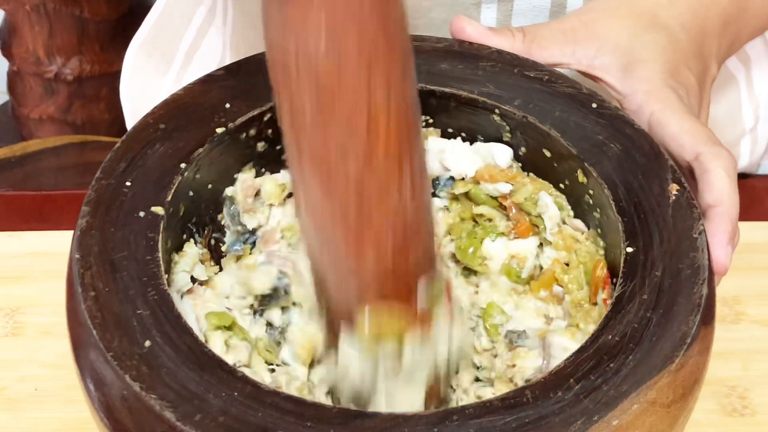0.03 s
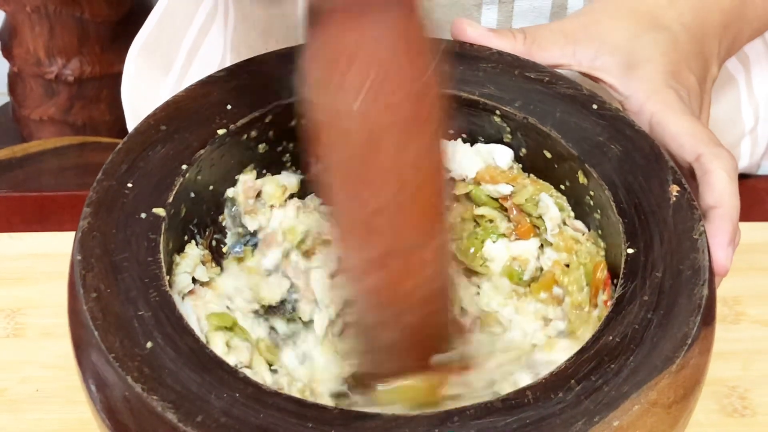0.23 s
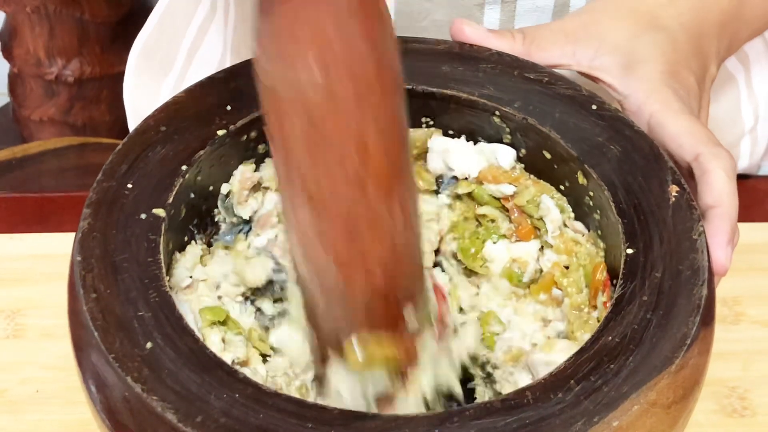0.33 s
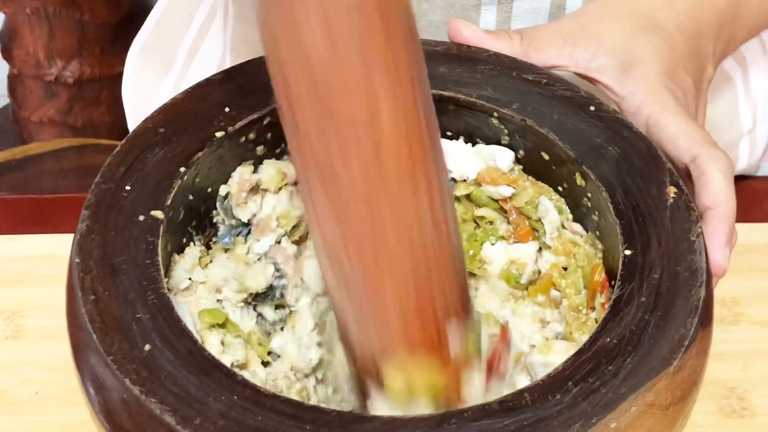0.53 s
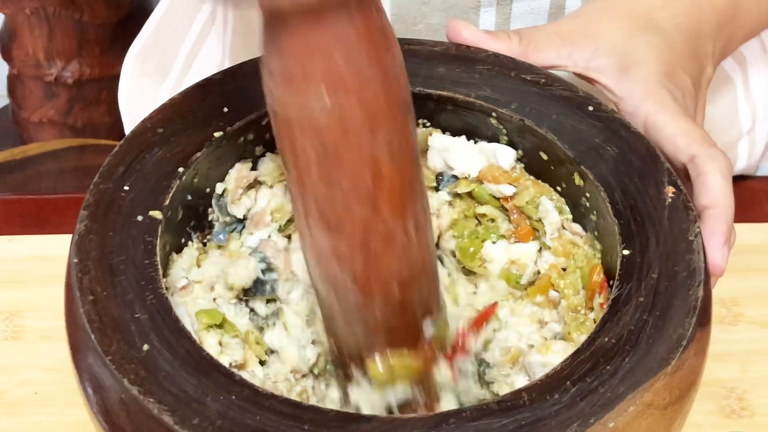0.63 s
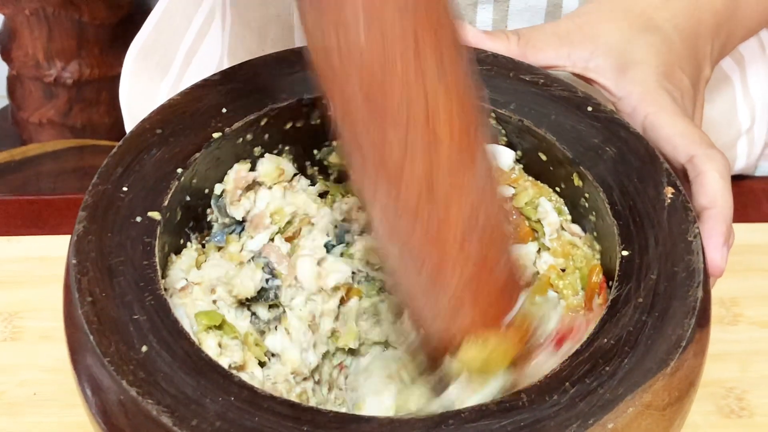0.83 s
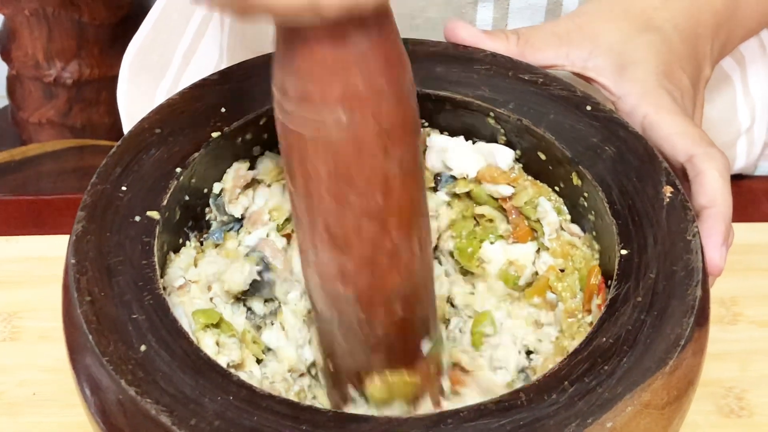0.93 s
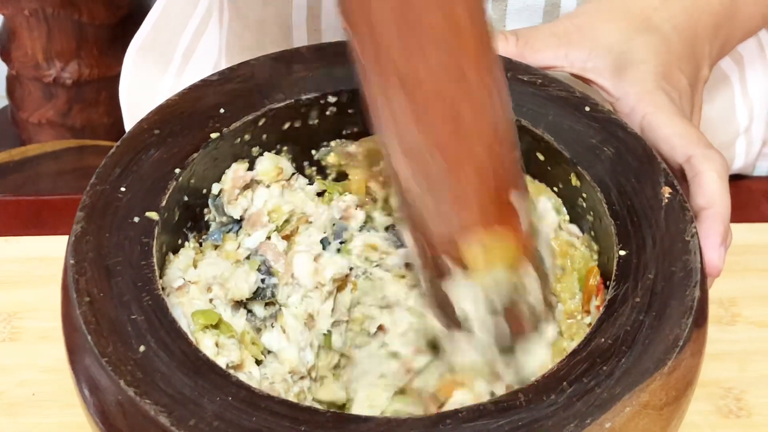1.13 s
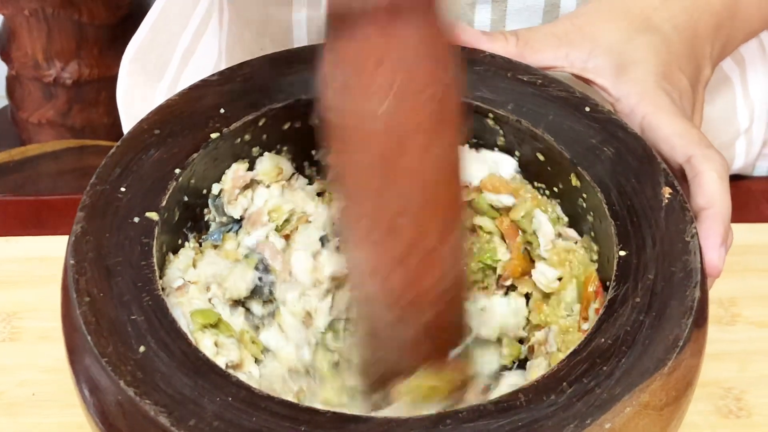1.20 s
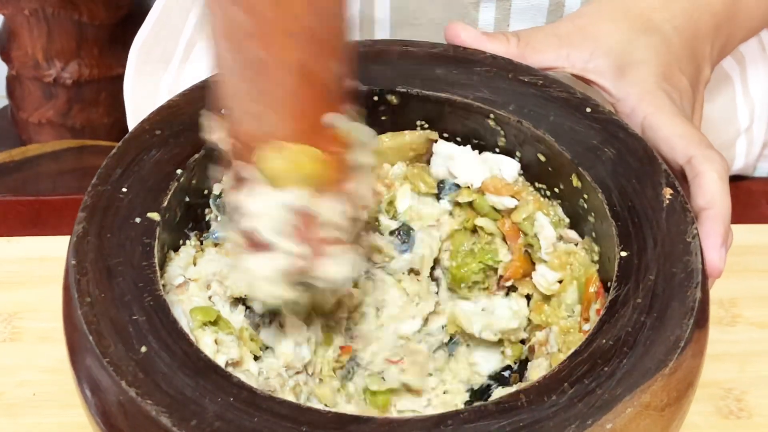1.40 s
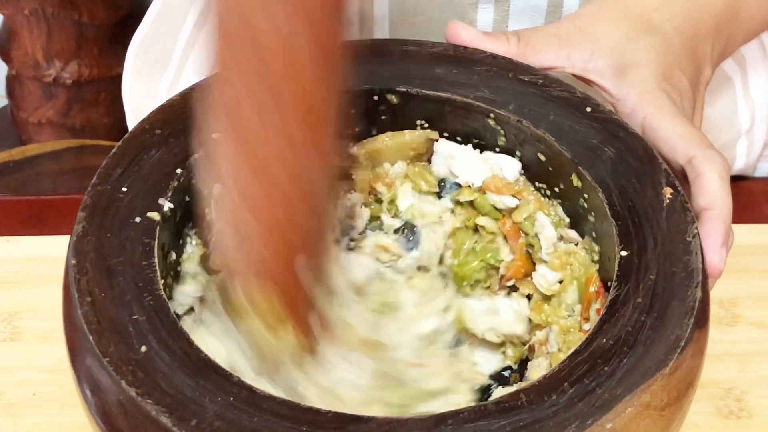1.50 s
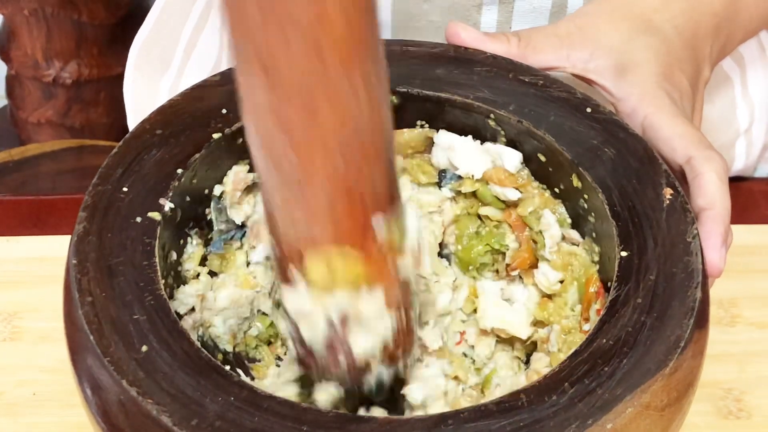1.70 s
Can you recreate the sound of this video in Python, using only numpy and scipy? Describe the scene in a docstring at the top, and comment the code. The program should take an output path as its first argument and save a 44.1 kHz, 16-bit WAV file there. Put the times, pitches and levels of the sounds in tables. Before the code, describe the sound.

A wooden pestle pounds wet mash in a wooden mortar, close by in a small quiet room. Firm hollow knocks with a low thud land at about 0.2 and 0.5 seconds, the second with the loudest squelch. A softer blow follows at 0.8, a faint wet press at 1.2, and another firm knock at 1.5. Short squelches and tiny wet pops trail each blow.

```python
"""Pounding wet mash in a wooden mortar

A wooden pestle pounds moist food, about three blows a second, close by in a small live room.
Each blow is a hollow knock that drops in pitch, a short ring of the wood and a thud of the table;
then the mash squelches and small wet pockets pop as the pestle grinds and lifts."""
import sys
import numpy as np
from scipy import signal
from scipy.fft import rfft, irfft, next_fast_len
from scipy.io import wavfile

SR = 44100
rng = np.random.default_rng(int(sys.argv[2]) if len(sys.argv) > 2 else 0)


def inscribe(sig):
    """Save sig as 16-bit PCM at rate SR to the path in sys.argv[1].

    A 1-D sig is mono; a 2-D sig holds one channel per row.
    Samples are clipped to [-1, 1] before scaling.
    """
    pcm = np.round(np.clip(np.atleast_2d(sig).T, -1, 1) * 32767)
    wavfile.write(sys.argv[1], SR, pcm.astype(np.int16))


N = 77175
LEAD = SR // 4  # samples of pre-roll, so a blow can ring in from before zero


def pestle():
    """Wood strikes wood: a hollow knock gliding down, a short ring, a blunt push and the table's thud."""
    # pestle blows: t/s, knock level/dB, hollow pitch/Hz, starts higher by/Hz, knock t60/s,
    # wood pitch/Hz, lower ring/dB, main ring/dB, upper ring/dB, push/dB, thud/dB
    blows = [(-.1, -5, 716, 308, 0.043, 1545, -34, -23.5, -44, -16, -32),
             (0.2083, -3, 715, 920, 0.026, 1626, -18, -14, -26, -21.5, -32.5),
             (0.5178, -4.5, 586, 654, 0.022, 1944, -25, -19, -34, -15, -32),
             (0.8232, -16, 765, 530, 0.037, 1954, -40, -38, -48, -31.5, -33.5),
             (1.162, -39, 655, 303, 0.025, 2130, -35, -40, -46, -40.5, -39),
             (1.4532, -3.5, 745, 186, 0.032, 1946, -31, -26, -72, -19, -38),
             (1.4765, -24.5, 794, 100, .022, 2010, -60, -49, -56, -50, -41)]
    # spectrum of the blunt contact: f/Hz, level/dB
    push_eq = [(30, -32), (100, -5.5), (180, -4), (300, -10.5), (520, 4), (900, -2.5), (1300, -11),
               (2200, -30), (2900, -18), (5000, -30), (16000, -38.5)]
    # the wood's three rings: ratio to the wood pitch, t60/s
    wood_modes = [(0.847, 0.027), (0.998, 0.031), (2.19, 0.021)]
    # low resonances of the table: f/Hz, level/dB, t60/s
    table_modes = [(69.7, -7.5, 0.15), (107.2, -4, 0.15), (151.2, 2, .18), (168.4, -1, 0.12),
                   (236.1, -6.5, 0.28), (337.5, -9.5, 0.22)]
    attack_s, glide_s = 0.0034, 0.0016
    out, t = np.zeros(LEAD + N), np.arange(SR // 2) / SR
    for s, db, hz, higher_hz, t60, wood_hz, *rings_db, push_db, thud_db in blows:
        pitch = hz + higher_hz * np.exp(-t / glide_s)
        knock = fade(t, attack_s, t60) * np.sin(2 * np.pi * np.cumsum(pitch) / SR)
        contact = rng.standard_normal(len(t)) * fade(t, attack_s, t60=0.011)
        push = coloured(contact, lambda f: along(push_eq, f))
        push /= np.abs(push).max()
        rings = [(wood_hz * ratio, level, life) for (ratio, life), level in zip(wood_modes, rings_db)]
        wood = ring(t, rings, attack_s=0.00033)
        thud = ring(t, table_modes, attack_s=0.015)
        add(out, s, in_room(amp(db) * knock + amp(push_db) * push + wood + amp(thud_db) * thud))
    return out


def squelches():
    """Squeezed mash: a swarm of tiny wet clicks over a fine fizz."""
    # squeezes of the mash: t/s, level/dB, rise/s, t60/s, treble tilt/(dB per octave)
    squeezes = [(.008, -47.5, 0.0027, 0.27, -1.5), (.191, -45.5, 0.0024, .06, -1.5),
                (.208, -37, 0.0086, 0.16, -3), (.27, -51, 0.006, 0.45, -2), (.328, -49.5, .024, 0.11, 0.5),
                (0.5156, -30, 0.0023, 0.017, 2.5), (.525, -47, 0.039, 0.15, -3),
                (.562, -23.5, 0.0052, 0.047, -0.5), (0.573, -40.5, 0.002, 0.33, -5),
                (.635, -51.5, 0.026, 0.23, 3.5), (.817, -38, 0.0071, 0.32, -5),
                (.882, -33.5, 0.0078, 0.031, -4), (.9, -49.5, 0.058, 0.19, -2.5),
                (1.122, -50.5, 0.019, 0.21, -1), (1.159, -42.5, .005, 0.29, -1),
                (1.228, -45, 0.015, 0.23, 2), (1.453, -44.5, 0.015, 0.42, 1.5),
                (1.508, -44.5, 0.0087, 0.19, -2), (1.575, -47.5, 0.025, 0.23, -5.5)]
    # spectrum of the wet mash: f/Hz, level/dB
    mash_eq = [(40, -43), (200, -14), (400, -7), (700, 7.5), (1300, 0), (2000, 3.5), (2800, -0.5),
               (4200, -2), (5500, -3.5), (7200, -5), (10000, -5.5), (15500, -10.5)]
    fizz_db, tilt_corner_hz = -2, 2000
    out, t = np.zeros(LEAD + N), np.arange(SR // 2) / SR
    for s, db, rise, t60, tilt_db in squeezes:
        swarm = unit(crackle(len(t)) + amp(fizz_db) * rng.standard_normal(len(t)))
        press = np.minimum(t / rise, 1) * amp(-60 * np.maximum(t - rise, 0) / t60)
        squelch = coloured(swarm * press,
                           lambda f: along(mash_eq, f) + tilt_db * np.log2(1 + f / tilt_corner_hz))
        add(out, s, amp(db) * in_room(squelch))
    return out


def crackle(size):
    """Tiny bursting films of liquid, each with its own pitch and strength; rms 1."""
    grains_per_s, spread_db, t60 = 2200, 4, 0.0034
    low_hz, high_hz = 640, 15330
    t = np.arange(SR // 150) / SR
    when, pitch, strength, phase = rng.random((int(grains_per_s * size / SR), 4)).T
    hz = low_hz + (high_hz - low_hz) * pitch
    gain = amp(spread_db * np.minimum(-np.log(1 - strength), 3))  # many soft, a few loud
    tones = np.sin(2 * np.pi * (hz[:, None] * t + phase[:, None]))
    grains = gain[:, None] * tones * amp(-60 * t / t60)
    where = (when * size).astype(int)[:, None] + np.arange(len(t))
    return unit(np.bincount(where.ravel(), grains.ravel(), size)[:size])


def pops():
    """Larger wet pockets burst, each a brief snap around its own pitch."""
    # bursting pockets: t/s, level/dB, f/Hz
    pockets = [(.2798, -28.5, 4260), (0.2878, -32, 4160), (.352, -44, 11500), (.356, -40.5, 2630),
               (0.5681, -16, 5430), (0.5204, -23, 13300), (.578, -32, 4930), (0.598, -23.5, 4820),
               (.598, -24.5, 9100), (.6587, -34, 3520), (0.8868, -27, 5300), (1.0205, -37, 9400),
               (1.1385, -36, 3130), (0.1927, -44, 7300), (1.1629, -28.5, 6160), (1.1813, -38, 1870),
               (1.2335, -41, 11000), (1.2464, -33, 5300), (1.25, -34.5, 4500), (1.618, -36.5, 8900)]
    t60, width_oct, click_db = 0.0074, 0.18, 14.5
    out, t = np.zeros(LEAD + N), np.arange(SR // 20) / SR
    for s, db, hz in pockets:
        burst = rng.standard_normal(len(t)) * amp(-60 * t / t60) + amp(click_db) * (t == 0)
        snap = coloured(burst, lambda f: -10 * np.log10(1 + (np.log2((f + 1) / hz) / width_oct) ** 4))
        add(out, s, amp(db) * in_room(snap / np.abs(snap).max()))
    return out


def grinding():
    """The dragged pestle rubs the bowl: a dull murmur through the resonances of mortar and table."""
    # drags through the mash after landing: t/s, level/dB, swell/s
    drags = [(0.216, -46, 0.012), (.535, -39.5, 0.033), (.835, -40.5, 0.03), (1.163, -48, 0.019),
             (1.485, -43.5, 0.03)]
    # body of mortar and table: f/Hz, level/dB
    body_eq = [(40, -14.5), (75, -5.5), (110, -4.5), (152, 5), (200, -5.5), (236, -1), (285, -12.5),
               (340, 0.5), (430, -10), (580, -3.5), (770, -0.5), (1100, -24), (2200, -19), (6000, -51)]
    out, t = np.zeros(LEAD + N), np.arange(SR // 3) / SR
    for s, db, swell_s in drags:
        rub = unit(coloured(rng.standard_normal(len(t)), lambda f: along(body_eq, f)))
        add(out, s, amp(db) * in_room(rub * swell(t, swell_s)))
    return out


def booms(hz=71):
    """A deep note, likely of the table, swells and dies after the blows."""
    # deep notes: t/s, level/dB
    notes = [(0.234, -44), (.565, -33), (0.877, -43), (1.179, -53), (1.473, -62)]
    out, t = np.zeros(LEAD + N), np.arange(SR // 2) / SR
    boom = swell(t, peak_s=0.034) * np.sin(2 * np.pi * hz * t)
    for s, db in notes:
        add(out, s, amp(db) * boom)
    return out


def in_room(x):
    """The direct sound, then a quick slap off the near walls and a diffuse tail, longest in the bass."""
    # decay of the room: f/Hz, t60/s
    decay = [(60, 0.95), (150, 0.95), (760, 0.64), (2000, 0.78), (4000, 0.59), (5600, 0.54), (7500, 0.41),
             (10000, 0.21), (16000, 0.54)]
    # colour of the tail: f/Hz, level/dB
    tail_eq = [(60, 8.5), (200, 6), (760, 0.5), (2000, -3), (5500, -1), (15000, 0)]
    predelay_s, tail_db, walls_db, walls_t60 = 0.012, -12, -11.5, 0.06
    hz, t, noise = signal.stft(rng.standard_normal(SR), SR, nperseg=256)
    envelope = amp(along(tail_eq, hz)[:, None] - 60 * t / along(decay, hz)[:, None])
    tail = signal.istft(noise * envelope, SR, nperseg=256)[1][:SR]
    walls = rng.standard_normal(SR) * amp(-60 * np.arange(SR) / SR / walls_t60)
    reverb = amp(tail_db) * tail / np.linalg.norm(tail) + amp(walls_db) * walls / np.linalg.norm(walls)
    return signal.fftconvolve(x, np.concatenate([[1], np.zeros(round(predelay_s * SR)), reverb]))


def air(level_db=-56):
    """Room tone: a quiet, steady, low rush."""
    # spectrum of the room tone: f/Hz, level/dB
    air_eq = [(25, -9), (50, -19.5), (100, 7), (155, 1.5), (220, -3.5), (400, -19), (620, -8), (760, -5.5),
              (1000, -17.5), (2000, -24.5), (5000, -32), (15500, -36)]
    return amp(level_db) * unit(coloured(rng.standard_normal(LEAD + N), lambda f: along(air_eq, f)))


def amp(db):
    """Decibels to gain."""
    return 10 ** (np.asarray(db) / 20)


def unit(x):
    """Scale to rms 1."""
    return x / np.sqrt(np.mean(x ** 2) + 1e-20)


def along(points, hz):
    """Read a curve of (f/Hz, value) points on a log frequency axis."""
    f, v = np.transpose(points)
    return np.interp(np.log(hz + 1), np.log(f + 1), v)


def coloured(x, db_of_hz):
    """Minimum-phase EQ of unit energy, shaped by the given dB curve."""
    size = 4096
    gain = amp(db_of_hz(np.fft.rfftfreq(size, 1 / SR)))
    cepstrum = irfft(np.log(np.maximum(gain, 1e-6)))
    cepstrum[1:size // 2] *= 2  # fold onto positive time: no pre-ring
    cepstrum[size // 2 + 1:] = 0
    impulse = irfft(np.exp(rfft(cepstrum)))
    return signal.fftconvolve(x, impulse / np.linalg.norm(impulse))[:len(x)]


def add(track, s, sound):
    """Mix a sound in at s seconds, counted from the end of the pre-roll."""
    part = track[max(0, LEAD + round(s * SR)):][:len(sound)]
    part += sound[:len(part)]


def fade(t, attack_s, t60):
    """Soft attack and exponential decay."""
    return (1 - np.exp(-t / attack_s)) * amp(-60 * t / t60)


def swell(t, peak_s):
    """A rounded rise to 1 at peak_s, then a slower fall."""
    return (t / peak_s * np.exp(1 - t / peak_s)) ** 2


def ring(t, modes, attack_s):
    """Damped sines from (f/Hz, level/dB, t60/s) rows, each level varied by about 1 dB."""
    return sum(amp(db + rng.normal(0, 1)) * fade(t, attack_s, t60) * np.sin(2 * np.pi * hz * t)
               for hz, db, t60 in modes)


def scene():
    """Mortar and mash in the room, in mono."""
    return (pestle() + grinding() + squelches() + pops() + booms() + air())[None, LEAD:]


def record(dry):
    """A low cut sheds the deepest rumble; a steep high cut closes off the very top."""
    low_cut_hz, high_cut_hz = 24, 16100
    trimmed = signal.sosfilt(signal.butter(2, low_cut_hz, "highpass", fs=SR, output="sos"), dry)
    size = next_fast_len(N + SR // 2)
    hz = np.fft.rfftfreq(size, 1 / SR)
    high_cut = 1 / np.sqrt(1 + (hz / high_cut_hz) ** 200)
    return irfft(rfft(trimmed, size) * high_cut, size)[:, :N]


dry = scene()
out = record(dry)
inscribe(out)
```